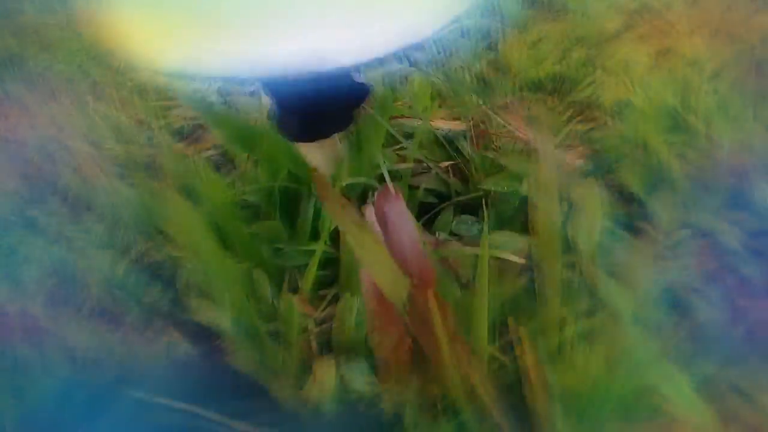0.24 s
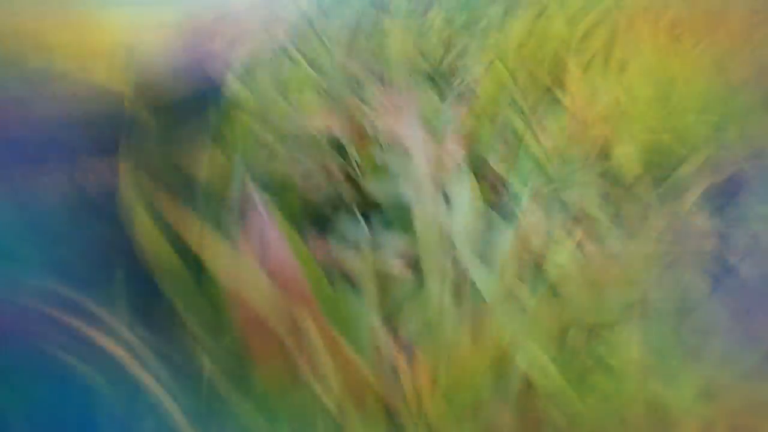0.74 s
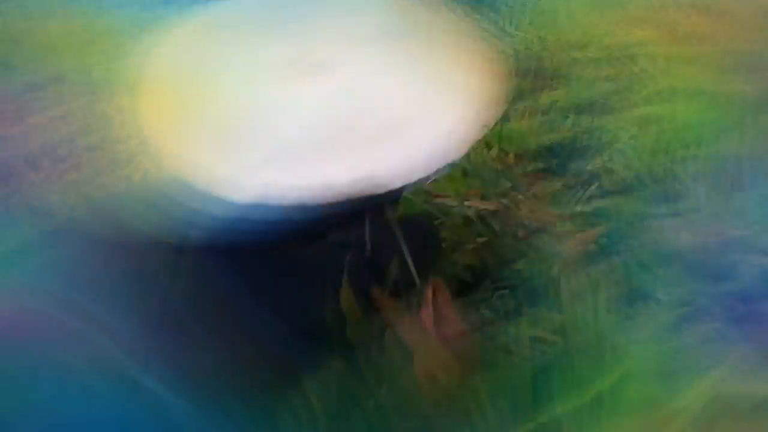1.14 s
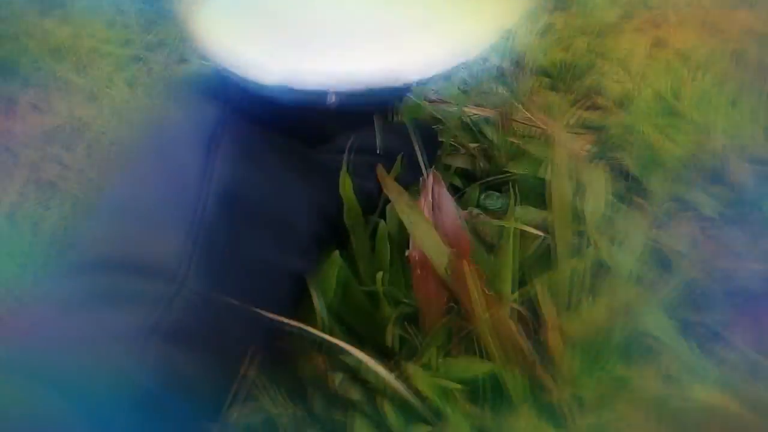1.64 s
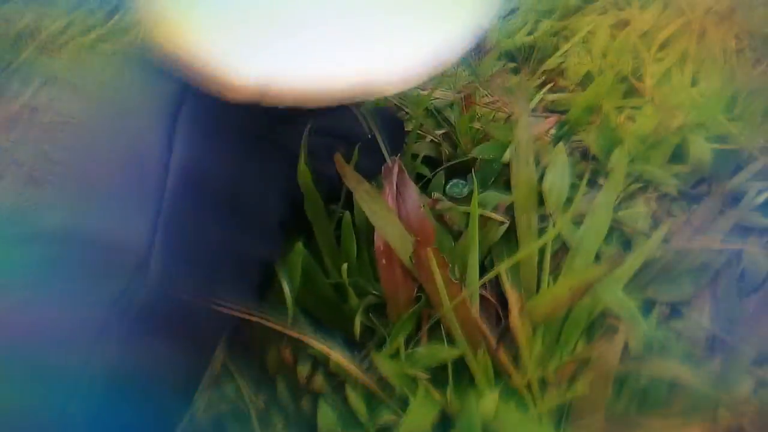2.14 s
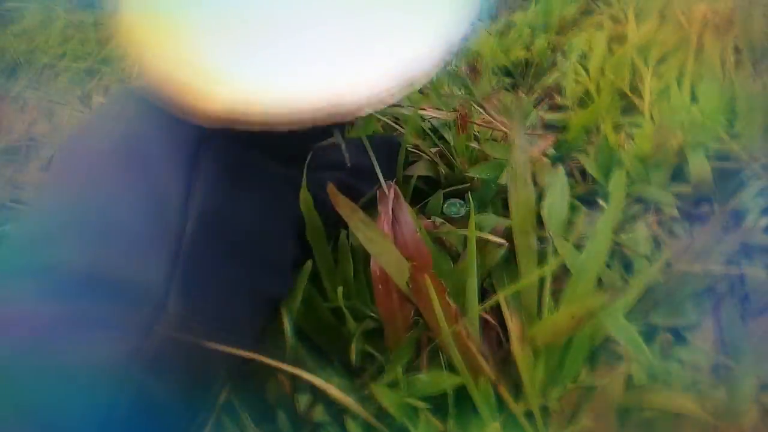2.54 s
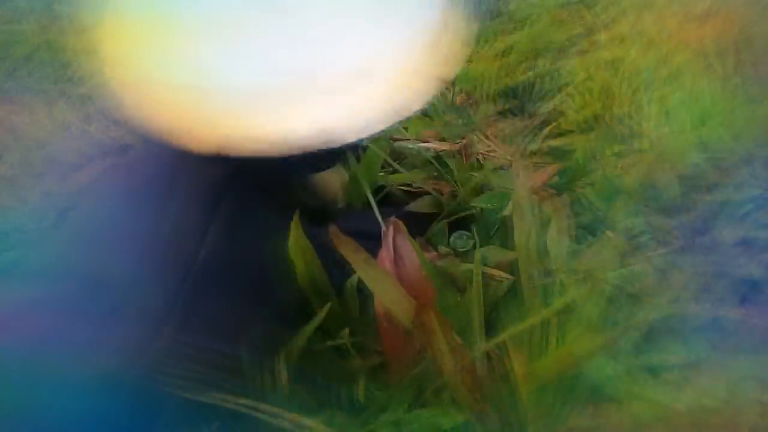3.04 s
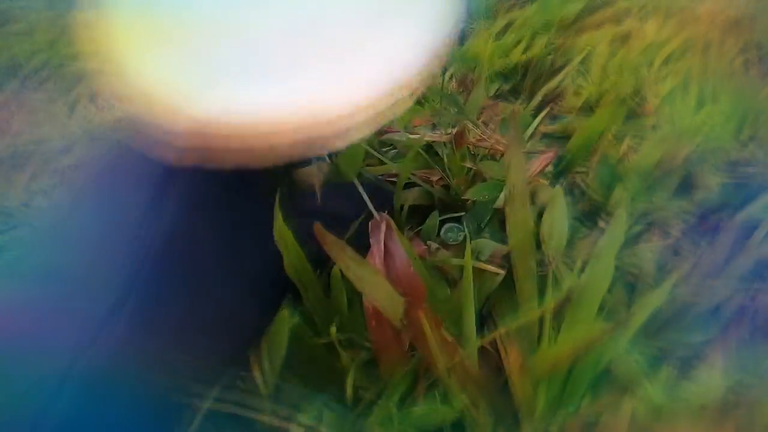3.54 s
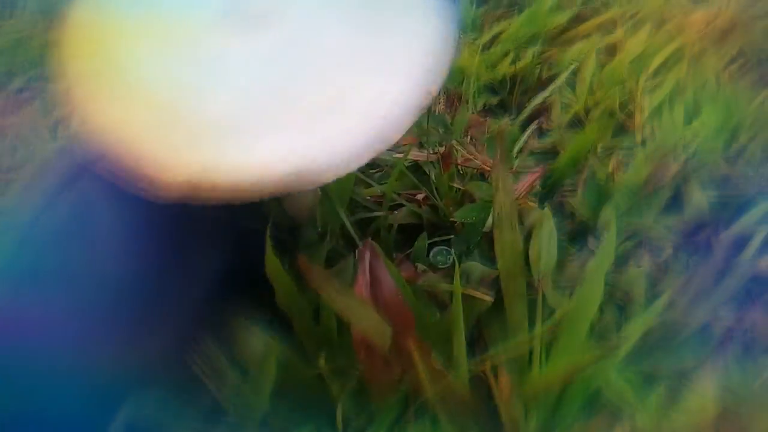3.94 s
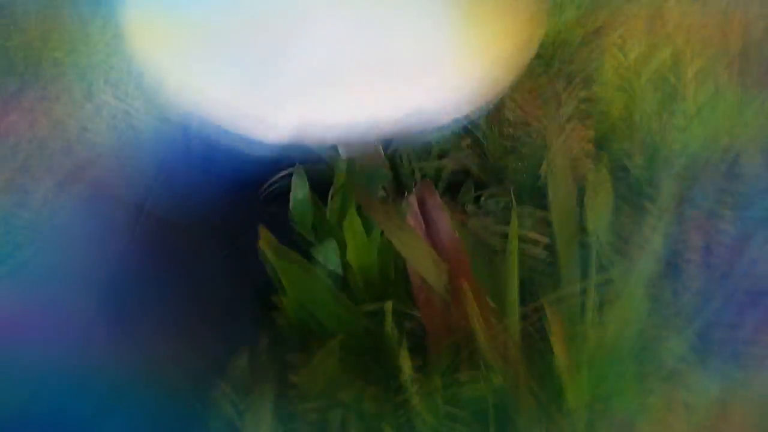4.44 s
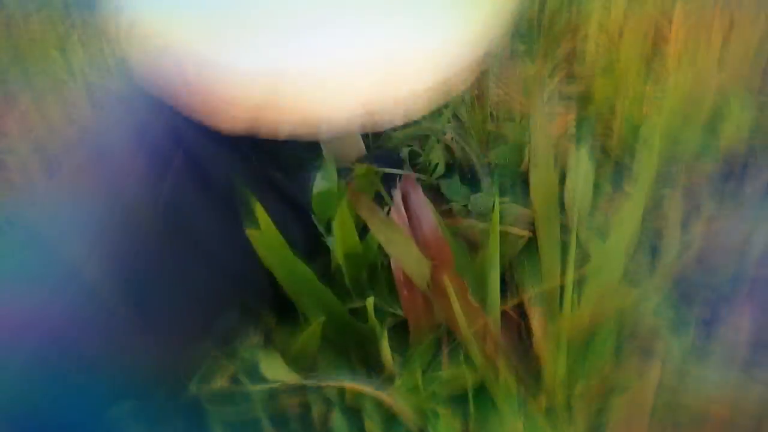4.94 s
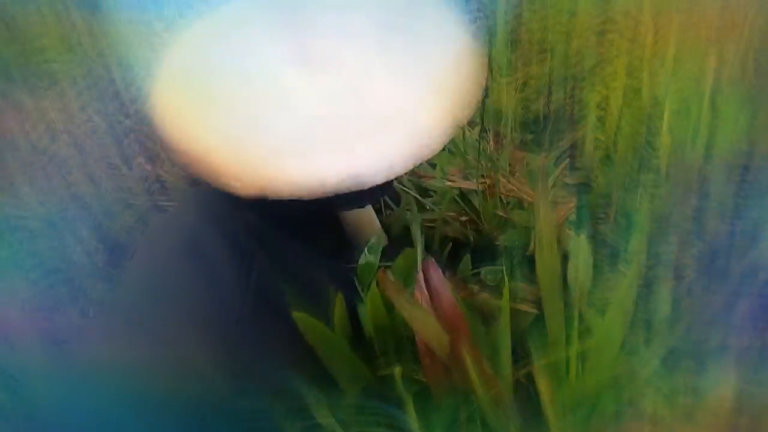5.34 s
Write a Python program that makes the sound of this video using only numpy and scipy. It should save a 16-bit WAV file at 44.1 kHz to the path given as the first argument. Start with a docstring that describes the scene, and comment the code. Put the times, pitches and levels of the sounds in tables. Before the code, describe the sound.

A distant light propeller aircraft drones steadily over an open meadow for about five and a half seconds. Its low, shimmering hum has a soft rumble and a smooth airy rush, with thin wavering tones drifting in and out; the pitch sinks slowly, more noticeably toward the end, while the drone grows somewhat fuller from about 3 s. Close to the microphone, grass and cloth rustle lightly from 0 to 0.6 s with tiny dry ticks, then mostly settle until about 2.3 s. Small rubs return around 2.8 s, and a faint brief insect chirp comes at 3 s over a barely audible, continuous high buzz. At 3.67 s a stem snaps with a small woody click; rustling and crackling thicken, peaking in a crisp brush near 4.15 s. Lighter rubs and ticks continue to about 4.9 s, then fade to sparse, faint touches under the continuing drone.

```python
"""A light propeller aircraft drones past far over a meadow, sines on its firing rate; its pitch sinks as it turns away.
Its rumble, a distant rush and far hiss are coloured noise; thin passing hums are wavering sines.
An insect buzzes on and another chirps once, both narrow bands of noise.
Grass and cloth rustle close to the microphone, grainy noise swelling with each rub, and stems tick in short bursts."""
import sys
import numpy as np
from scipy import signal
from scipy.fft import rfft, irfft
from scipy.io import wavfile
from scipy.ndimage import uniform_filter1d

SR = 44100
rng = np.random.default_rng(int(sys.argv[2]) if len(sys.argv) > 2 else 0)


def to_wav(s):
    """Save 16-bit WAV."""
    ch = np.atleast_2d(s).T  # columns
    pcm = np.round(np.clip(ch, -1, 1) * 32767)  # PCM
    wavfile.write(sys.argv[1], SR, pcm.astype(np.int16))


N = 245637
TIME = np.arange(N) / SR  # s

# colour of the distant rush, also of the dull body of close rubs: freq_hz, relative_level_db (per Hz)
RUSH_COLOUR = [(300, -48.5), (800, -19), (1200, -3.5), (1700, -0.5), (2300, -3.5), (3200, -17),
               (4500, -35.5), (6500, -52.5), (10000, -57.5), (16000, -59)]
# colour of the lower rush, also of the low body of close rubs: freq_hz, relative_level_db (per Hz)
LOW_RUSH_COLOUR = [(100, -42), (400, -3), (550, -2), (780, -6), (1000, -2), (1500, -14), (4000, -72)]


def undb(db):
    """Decibels to an amplitude factor."""
    return 10 ** (np.asarray(db) / 20)


def unit(x):
    """Scale to an RMS of 1."""
    return x / np.sqrt(np.mean(x ** 2))


def curves(table):
    """Columns of a table joined by straight lines in time."""
    s, *columns = np.transpose(table)
    return [np.interp(TIME, s, c) for c in columns]


def walk(rate_hz):
    """Random levels held for 1 / rate and slewed twice; spread near 1."""
    hold = int(SR / rate_hz)
    steps = np.repeat(rng.standard_normal(N // hold + 1), hold)
    slewed = uniform_filter1d(uniform_filter1d(steps, hold), hold)
    return 1.3 * slewed[:N]


def colour(x, spectrum):
    """Shape a sound's spectrum by points joined along log frequency."""
    hz, db = np.transpose(spectrum)
    bins_hz = np.arange(N // 2 + 1) * SR / N + 1  # +1 keeps the log finite
    gain = undb(np.interp(np.log(bins_hz), np.log(hz), db))
    return irfft(rfft(x) * gain, N)


def ring(x, hz, width_hz):
    """One resonance, gain 1 at the centre."""
    return signal.lfilter(*signal.iirpeak(hz, hz / width_hz, fs=SR), x)


def tone(hz, db, waver_db, waver_rad):
    """A sine whose level and phase shimmer in the moving air."""
    turn = 2 * np.pi * (np.cumsum(hz) / SR + rng.random())
    shimmer_db = waver_db * (walk(14) + 0.38 * walk(5.19))
    level = np.sqrt(2) * undb(db + shimmer_db)  # a sine peaks at sqrt(2) times its RMS
    return level * np.sin(turn + waver_rad * walk(8))


def fade(start, end, rise_s, fall_s):
    """Straight-line gain that rises from 0 at the start, at most to 1, and falls to 0 at the end."""
    return np.clip(np.minimum((TIME - start) / rise_s, (end - TIME) / fall_s), 0, 1)


def narrow(hz, width_hz):
    """Noise in a steep band around a centre that may glide."""
    low = signal.butter(6, width_hz / 2, fs=SR, output="sos")
    a, b = signal.sosfilt(low, rng.standard_normal((2, N)))
    turn = 2 * np.pi * np.cumsum(hz + np.zeros(N)) / SR
    return unit(a * np.cos(turn) + b * np.sin(turn))


def aircraft():
    """Exhaust and propeller lines on the firing rate; the strong third shimmers least."""
    # sinking firing rate as heard: time_s, firing_rate_hz
    firing = [(0.0, 78.33), (0.8, 78.18), (1.6, 77.87), (2.4, 77.25), (3.2, 76.37), (4.0, 75.27),
              (4.8, 73.77), (5.57, 72.0)]
    # second, third and fifth multiples, whose levels come and go (before shimmer):
    # time_s, second_db, third_db, fifth_db
    drone = [(0.0, -46, -35.5, -53.5), (0.35, -36, -34, -56), (0.9, -38, -33.5, -53),
             (1.5, -46.5, -30.5, -48.5), (1.9, -35.5, -31.5, -50), (2.5, -39.5, -32, -51),
             (2.8, -34.5, -29.5, -49.5), (3.0, -40, -33, -51), (3.12, -28, -27, -53),
             (3.3, -34.5, -29.5, -51), (3.55, -33.5, -28, -50.5), (3.85, -30, -29.5, -52),
             (4.3, -30.5, -26.5, -46.5), (4.75, -30, -29.5, -52), (4.95, -32.5, -28.5, -51.5),
             (5.57, -29.5, -31.5, -52)]
    # first, fourth and sixth multiples, whose levels drift evenly (before shimmer):
    # multiple, start_level_db, change_db_per_s
    drifting_lines = [(1, -41, 0.17), (4, -56.5, 1.1), (6, -63, -1.5)]
    hz, = curves(firing)
    second_db, third_db, fifth_db = curves(drone)
    loose = dict(waver_db=3.0, waver_rad=.9)
    second = tone(2 * hz, second_db, waver_db=1.8, waver_rad=.6)
    third = tone(3 * hz, third_db, waver_db=1.2, waver_rad=.4)
    fifth = tone(5 * hz, fifth_db, **loose)
    drifting = sum(tone(k * hz, db + per_s * TIME, **loose) for k, db, per_s in drifting_lines)
    return second + third + drifting + fifth


def hums():
    """Thin separate unsteady tones that come and go, most of them sliding down slowly."""
    # pitch glides, levels before fade and shimmer:
    # start_s, end_s, first_hz, last_hz, level_db
    # (the last row ends before it starts, so its fade leaves it practically silent)
    glides = [(0.0, 1.3, 303, 297, -45), (1.6, 5.64, 328.6, 310.6, -47.5), (2.4, 3.9, 280.4, 267, -44),
              (2.6, 4.68, 134.5, 130.8, -38), (0.0, 1.5, 126, 123, -42), (2.2, 5.57, 93.2, 93.6, -41.5),
              (2.5, 5.0, 117, 109, -51), (5.0, 4.4, 152.2, 147.3, -29.5)]
    out = np.zeros(N)
    for start, end, first, last, db in glides:
        hz = np.interp(TIME, [start, end], [first, last])
        swell = fade(start - .3, end + 0.31, 0.47, 0.57)
        out += swell * tone(hz, db, waver_db=1.5, waver_rad=0.77)
    return out


def air():
    """Low turbulent rumble of the aircraft, the smooth rush above it and a far hiss."""
    # layer levels: time_s, rumble_db, low_rush_db, high_rush_db, far_hiss_db
    air_levels = [(0.0, -35, -53.5, -48, -64.5), (0.7, -31, -53, -48, -70.5), (1.3, -33, -52, -48, -70.5),
                  (2.2, -35.5, -53, -48, -73.5), (3.1, -34.5, -53, -46, -70.5),
                  (4.2, -34, -54.5, -47, -63.5), (5.57, -34.5, -55, -44.5, -63)]
    # low colour of the far aircraft: freq_hz, relative_level_db (per Hz)
    rumble_colour = [(8, -30), (16, -25.5), (25, -15), (40, -4.5), (65, 1.5), (100, 5), (180, 7),
                     (260, 3.5), (340, -5), (430, -15.5), (600, -42.5), (2000, -100)]
    # colour of the far hiss: freq_hz, relative_level_db (per Hz)
    hiss_colour = [(800, -51), (2500, -13.5), (3500, -1.5), (5000, -4), (5800, -11), (7000, -17.5),
                   (11000, -20.5), (16000, -22.5)]
    shapes = (rumble_colour, LOW_RUSH_COLOUR, RUSH_COLOUR, hiss_colour)
    flickers_db = (1.55, 0.78, 0.98, 0.45)
    out = np.zeros(N)
    for db, shape, flicker_db in zip(curves(air_levels), shapes, flickers_db):
        noise = rng.standard_normal(N) * undb(flicker_db * walk(40))
        out += undb(db) * unit(colour(noise, shape))
    return out


def insects():
    """A steady noisy buzz pulsed at the wing rate and one short two-band chirp."""
    # steady buzz, level before pulsing and drift: centre_hz, width_hz, pulse_rate_hz, level_db
    buzz = (10850, 1300, 137, -75)
    # bands of the chirp, levels before fade and flicker:
    # start_s, end_s, first_hz, last_hz, width_hz, level_db
    chirp = [(2.985, 3.2, 6500, 6550, 400, -73.5), (2.96, 3.11, 4550, 4850, 220, -71.5)]
    hz, width, rate, db = buzz
    pulse_hz = rate * (1 + .006 * walk(3))
    gate = 1 + .26 * np.sin(2 * np.pi * np.cumsum(pulse_hz) / SR)
    out = undb(db + 0.63 * walk(3)) * gate * narrow(hz, width)
    for start, end, first, last, width, db in chirp:
        glide_hz = np.interp(TIME, [start, end], [first, last])
        level = undb(db + 2.5 * walk(49)) * fade(start, end, .03, 0.045)
        out += level * narrow(glide_hz, width)
    return out


def rubbing():
    """Gains of the rustle and of its top: every rub swells and dies away over the steady stir."""
    # grass and cloth stirring all the time: time_s, gain_db
    stir_levels = [(0.0, -75), (0.62, -69.5), (0.7, -75.5), (1.1, -79.5), (2.3, -84), (2.4, -77),
                   (2.65, -80), (2.72, -87), (3.1, -76), (3.55, -81), (3.6, -72), (4.7, -70), (5.4, -74),
                   (5.57, -81)]
    # single rubs, rise and fall each over 10 dB: peak_s, gain_db, rise_s, fall_s, top_above_gain_db
    rubs = [(0.02, -62, 0.014, 0.12, 7), (0.33, -61, 0.14, 0.11, 3), (0.57, -68, 0.043, .09, 0),
            (0.88, -74.5, 0.16, .2, -6), (1.26, -72.5, .03, .03, 5), (2.37, -74, .05, .08, -6),
            (2.58, -74, .1, .1, -4), (2.785, -63.5, 0.035, 0.1, -1), (2.98, -66, 0.029, .04, -1),
            (3.26, -73, .07, 0.068, 1), (3.61, -68, 0.037, 0.09, 0), (3.72, -62.5, 0.066, 0.036, 3),
            (3.79, -63, .06, 0.034, 0), (3.95, -63.5, 0.096, 0.062, 1), (4.155, -52, 0.074, 0.078, 3),
            (4.3, -67, 0.039, 0.066, -8), (4.52, -66, 0.088, 0.055, -5), (4.629, -66, .04, 0.04, -6),
            (4.79, -70, 0.034, .03, -3), (4.89, -64.5, 0.052, 0.064, -3), (5.1, -77, .08, .08, 0),
            (5.33, -75, 0.054, 0.089, 0)]
    stir_top_db = -4.5  # top against the stir's own gain
    power = undb(curves(stir_levels)[0]) ** 2
    top = power * undb(stir_top_db) ** 2
    for s, db, rise, fall, top_db in rubs:
        drop_db = 10 * np.maximum((s - TIME) / rise, (TIME - s) / fall)
        rub = undb(db - drop_db) ** 2
        power = power + rub
        top = top + rub * undb(top_db) ** 2
    return np.sqrt(power), np.sqrt(top)


def rustle(crackle_db=-0.5, per_s=700):
    """Dense tiny slips of nearly even size at random moments over a soft hiss; the top varies by rub."""
    # bright colour of grass and cloth: freq_hz, relative_level_db (per Hz)
    rustle_colour = [(300, -53), (1500, -9.5), (3000, -12.5), (5000, -3.5), (6600, -9), (7800, -3),
                     (10000, 0.5), (12500, -4.5), (15800, -6)]
    hiss_db, body_db, low_body_db = 3.0, 10.5, 3  # against the rubbing gain
    gain, top_gain = rubbing()
    sizes = undb(crackle_db * np.minimum(rng.exponential(size=N), 4))
    slips = (rng.random(N) < per_s / SR) * sizes
    smear = np.exp(-np.arange(200) / 49.0)  # each slip decays with a time constant near 1.1 ms
    grain = 1.1 + unit(np.convolve(slips, smear)[:N])
    band = colour(rng.standard_normal(N) * grain * undb(0.7 * walk(50)), rustle_colour)
    low = signal.sosfiltfilt(signal.butter(4, 11800, fs=SR, output="sos"), band)
    top = band - low
    body = undb(body_db) * unit(colour(rng.standard_normal(N), RUSH_COLOUR))
    low_body = undb(low_body_db) * unit(colour(rng.standard_normal(N), LOW_RUSH_COLOUR))
    return gain * (undb(hiss_db) * unit(low) + body + low_body) + top_gain * unit(top)


def ticks(decay_s=.0011):
    """Stems tick close by: each tick is a short broad burst; a snap adds a woody ring."""
    # single ticks of stems: start_s, peak_db, centre_hz
    stem_ticks = [(0.0363, -44, 11100), (0.165, -52, 10500), (0.2134, -50, 10600), (0.2957, -46, 10100),
                  (0.4933, -48, 10000), (0.5645, -46, 9300), (0.624, -46, 10670), (2.378, -56, 8530),
                  (2.5316, -51, 10400), (2.7551, -50, 10800), (2.7873, -47, 11300), (3.26, -50, 10700),
                  (3.5738, -61, 6060), (3.6082, -53, 8200), (3.669, -35, 9750), (3.9589, -49, 10900),
                  (3.961, -46, 5180), (4.0308, -45, 8910), (4.0482, -45, 9630), (4.0648, -51, 7870),
                  (4.1031, -41, 9600), (4.125, -42, 11800), (4.144, -34, 9490), (4.2966, -49, 8900),
                  (4.4566, -46, 7380), (4.599, -47, 9700), (4.6363, -43, 9660), (4.512, -48, 8000),
                  (4.537, -47, 7800), (4.556, -51, 8400), (4.787, -51, 11500), (4.886, -51, 11000),
                  (5.075, -53, 13500), (5.297, -51, 12500), (5.317, -52, 9500), (5.3717, -52, 11400)]
    # woody snap: start_s, level_db (before decay), ring_hz, t60_s
    snaps = [(3.668, -27, 1970, 0.012)]
    out, age = np.zeros(N + 2000), np.arange(2000) / SR
    for s, db, hz in stem_ticks:
        burst = rng.standard_normal(2000) * np.exp(-age / decay_s)
        for _ in range(2):
            burst = ring(burst, hz, 0.32 * hz)
        out[int(s * SR):][:2000] += undb(db) * burst / np.abs(burst).max()
    for s, db, hz, t60 in snaps:
        decay = np.exp(-np.log(1000) * age / t60)
        out[int(s * SR):][:2000] += undb(db) * np.sin(2 * np.pi * hz * age) * decay
    return out[:N]


def scene():
    """Far aircraft and air, insects, and grass and cloth near the microphone, summed to one channel."""
    far = aircraft() + hums() + air()
    near = rustle() + ticks()
    return (far + insects() + near)[None]


def record(dry):
    """The microphone adds its own faint hiss; the recorder cuts the top steeply."""
    mic_hiss_db, top_hz = -80.5, 15750  # hiss level before the cut
    wet = dry + undb(mic_hiss_db) * rng.standard_normal(dry.shape)
    return signal.sosfilt(signal.ellip(12, .2, 80, top_hz, fs=SR, output="sos"), wet)


dry = scene()
out = record(dry)
to_wav(out)
```